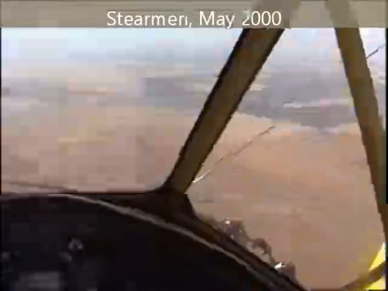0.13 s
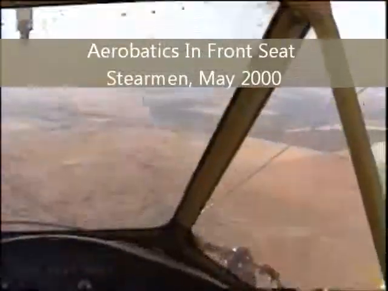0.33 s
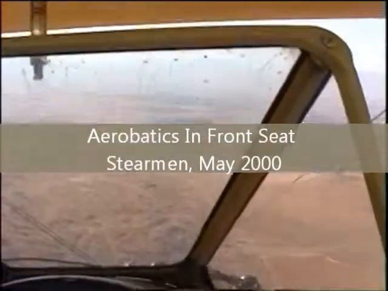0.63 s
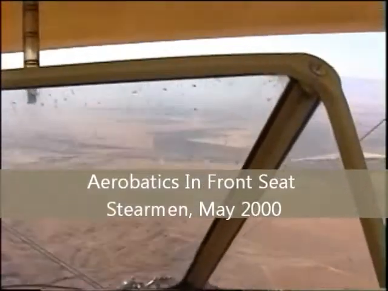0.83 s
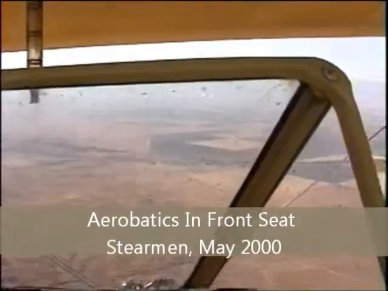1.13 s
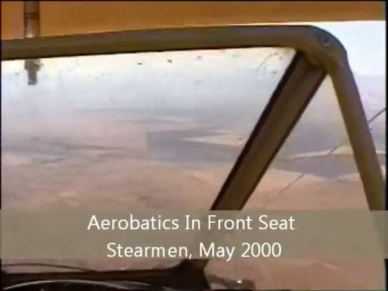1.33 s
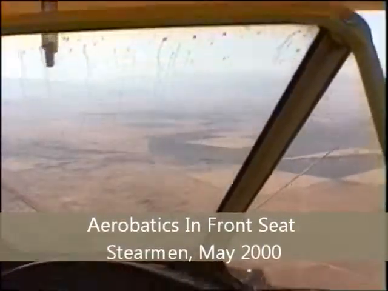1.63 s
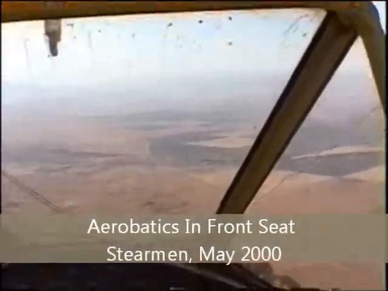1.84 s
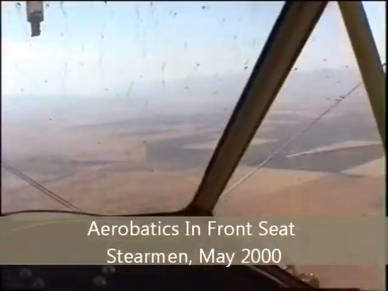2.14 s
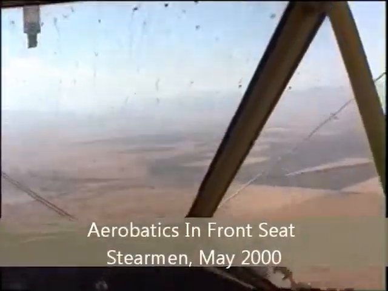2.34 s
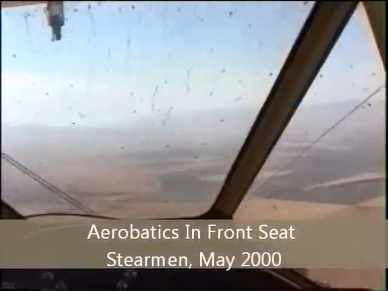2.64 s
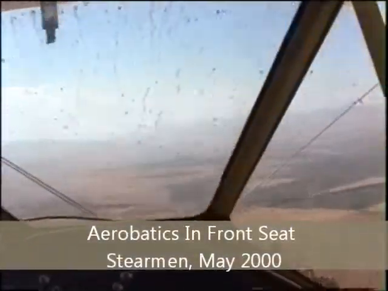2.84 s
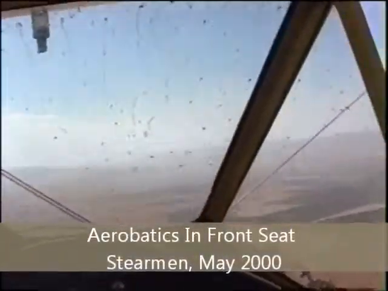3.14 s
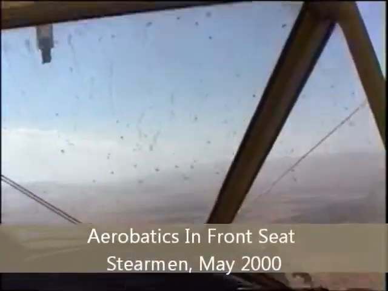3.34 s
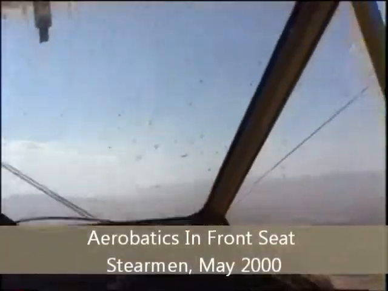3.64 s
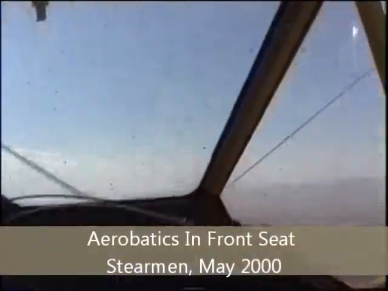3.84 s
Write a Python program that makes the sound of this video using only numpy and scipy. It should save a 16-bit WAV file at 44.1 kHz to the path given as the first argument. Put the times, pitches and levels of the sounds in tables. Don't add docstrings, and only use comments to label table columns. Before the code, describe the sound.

A radial piston aircraft engine drones in an open cockpit, fading in from silence. Wind buffets the overloaded onboard stereo microphone, roaring and hissing, while a high fluttering whistle enters midway and grows stronger.

```python
import sys
import numpy as np
from scipy import signal
from scipy.fft import rfft, irfft, next_fast_len
from scipy.io import wavfile
from scipy.ndimage import uniform_filter1d, map_coordinates

SR = 44100
rng = np.random.default_rng(int(sys.argv[2]) if len(sys.argv) > 2 else 0)


def makeup_ratio(level_db):
    decades = np.asarray(level_db, float) / 20
    return 10 ** decades


def to_wav(s):
    ch = np.atleast_2d(s).T
    pcm = np.round(np.clip(ch, -1, 1) * 32767)
    wavfile.write(sys.argv[1], SR, pcm.astype(np.int16))


N = 176400
CYCLE_HZ = 15.86


def unit(x):
    return x / np.sqrt(np.mean(x ** 2) + 1e-20)


def along(points, hz):
    point_hz, value = np.transpose(points)
    return np.interp(np.log(hz + 1), np.log(point_hz + 1), value)


def wobble(rate_hz):
    return map_coordinates(rng.standard_normal(400), [np.arange(N) * rate_hz / SR])


def filtered(x, response):
    m = next_fast_len(N + SR // 2)
    hz = np.fft.rfftfreq(m, 1 / SR)
    return irfft(rfft(x, m) * response(hz), m)[..., :N]


def split_db(left_over_right_db):
    return left_over_right_db * np.array([[.5], [-.5]])


def engine():
    # (multiple of the cycle [1], level [dB rms])
    orders = [(2, -51), (7, -38), (8, -38), (9, -36), (11, -41), (14, -41), (15, -42), (16, -37), (17, -43),
              (18, -41), (19, -38), (20, -38), (21, -39), (23, -33), (24, -42), (25, -38), (26, -41),
              (27, -39), (29, -45), (31, -47), (46, -50)]
    speed_wander, drone_db, sway_db = 0.001987, 0.5, 2
    cycles = np.cumsum(CYCLE_HZ * (1 + speed_wander * wobble(1.9923))) / SR
    drone = np.zeros((2, N))
    for order, level_db in orders:
        phase = 2 * np.pi * (order * cycles + rng.random()) + 0.29 * wobble(8)
        apart_rad = rng.normal(0, 6 / order) * np.array([[.5], [-.5]])
        gain = np.sqrt(2) * makeup_ratio(level_db + sway_db * wobble(5.948))
        drone += gain * np.sin(phase + apart_rad)
    return makeup_ratio(drone_db + split_db(1.2)) * drone


def whistle_breath():
    # (time [s], level [dB], pitch [Hz])
    breath_course = [
        (0, -48, 3052),
        (1.6, -45.5, 2998),
        (2.1, -33.5, 3067),
        (2.901, -31.5, 3218),
        (3.05, -36, 3082),
        (3.4, -31.5, 3186),
        (3.52, -34, 3033),
        (3.7, -31.5, 3157),
        (4, -28.5, 2993),
    ]
    flutter_hz, flutter_depth, width_hz, lowest_hz = 37.5, .6, 424, 2950
    time_s, level_db, pitch_hz = np.transpose(breath_course)
    now = np.arange(N) / SR
    air = filtered(rng.standard_normal((2, 2, N)), lambda f: 1 / (1 + (2 * f / width_hz) ** 2))
    air[1] = .6 * air[0] + .8 * air[1]
    phase = 2 * np.pi * np.cumsum(np.interp(now, time_s, pitch_hz) + 40 * wobble(15)) / SR
    flutter = np.sin(2 * np.pi * flutter_hz * now + .8 * wobble(6))
    opening = (1 + flutter_depth * flutter) * makeup_ratio(1.5 * wobble(30))
    band = air[:, 0] * np.cos(phase) + air[:, 1] * np.sin(phase)
    breath = makeup_ratio(np.interp(now, time_s, level_db)) * unit(opening * band)
    return filtered(breath, lambda f: 1 / (1 + (lowest_hz / (f + 1)) ** 40))


def whistle_chirps():
    # (time [s], level [dB rms], pitch [Hz], length [s])
    chirp_events = [(2.146, -28, 3050, 0.009), (2.397, -27, 3100, 0.005), (2.43, -28, 3180, 0.005),
                    (2.482, -27, 3110, 0.006), (2.527, -24, 3100, 0.004), (2.558, -27, 3100, 0.005),
                    (2.665, -23, 3160, 0.005), (2.745, -27, 3110, 0.009), (2.853, -28, 3160, 0.005),
                    (2.932, -27, 3270, 0.004), (2.994, -26, 3150, 0.008), (3.155, -26, 3100, 0.005),
                    (3.185, -26, 3060, 0.005), (3.263, -27, 3160, 0.007), (3.285, -26, 3070, 0.006),
                    (3.366, -27, 3180, 0.004), (3.391, -24, 3140, 0.004), (3.581, -25, 3020, 0.005),
                    (3.632, -27, 3120, 0.004), (3.656, -25, 3120, 0.004), (3.67, -26, 3190, 0.002),
                    (3.694, -26, 3090, 0.005), (3.713, -23, 3150, 0.005), (3.764, -26, 3090, 0.011),
                    (3.801, -27, 3160, 0.004), (3.845, -21, 3040, 0.006), (3.879, -19, 3050, 0.005),
                    (3.921, -26, 3080, 0.004), (3.933, -22, 3040, 0.007), (3.949, -24, 3060, 0.005)]
    chirp_db, half = .5, 900
    out = np.zeros(N + SR)
    t = np.arange(-half, half) / SR
    for time_s, level_db, pitch_hz, length_s in chirp_events:
        envelope = np.exp(-np.log(4) * (t / length_s) ** 2)
        jitter_rad = np.cumsum(rng.normal(0, .04, len(t)))
        tone = np.sin(2 * np.pi * (.995 * pitch_hz * t + rng.random()) + jitter_rad)
        out[round(time_s * SR):][:len(t)] += np.sqrt(2) * makeup_ratio(level_db + chirp_db) * envelope * tone
    return out[half:N + half]


def whistle():
    right_db, lag_s = -7.5, .00003
    left, right = whistle_breath() + whistle_chirps()
    right = filtered(right, lambda f: np.exp(-2j * np.pi * f * lag_s))
    return np.array([left, makeup_ratio(right_db) * right])


def rush(spectrum, alike, patchy_db, pan_db):
    z = signal.stft(rng.standard_normal((2, N)), nperseg=512)[2]
    field = uniform_filter1d(rng.standard_normal(z.shape[1:]), size=6, axis=0)
    field = uniform_filter1d(field, size=8, axis=1)
    pair = signal.istft(z * makeup_ratio(patchy_db * unit(field)), nperseg=512)[1][:, :N]

    def mid_side(hz):
        turn = np.arccos(along(alike, hz)) / 2
        return makeup_ratio(along(spectrum, hz)) * [np.cos(turn), np.sin(turn)]

    mid, side = filtered(pair, mid_side)
    return unit(np.array([mid + side, mid - side]) * makeup_ratio(split_db(pan_db)))


def buffeting():
    # (frequency [Hz], density [dB per Hz])
    buffet_spectrum = [(8, -24), (30, -11.5), (60, -2.5), (110, -0.5), (200, -3.5), (400, -16.5),
                       (800, -21.5), (1600, -32)]
    # (frequency [Hz], left-right likeness [-1..1])
    buffet_alike = [(60, -0.265), (160, -0.128), (400, 0.11)]
    level_db = -22 + 1.25 * np.array([wobble(11), wobble(12)])
    return makeup_ratio(level_db) * rush(buffet_spectrum, buffet_alike, patchy_db=0.76, pan_db=-1.5)


def screen_roar(speed_db, gust_db):
    # (frequency [Hz], density [dB per Hz])
    roar_spectrum = [(80, -48), (200, -5), (420, -0.5), (560, -7), (950, -6.5), (2000, -14), (4500, -17),
                     (16000, -30.5)]
    # (frequency [Hz], left-right likeness [-1..1])
    roar_alike = [(400, 0.636), (900, 0.805), (2000, 0.343), (3000, 0.515), (4500, 0.03)]
    level_db = -24 + 0.915 * speed_db + gust_db + 0.813 * wobble(40)
    return makeup_ratio(level_db) * rush(roar_spectrum, roar_alike, patchy_db=0.9335, pan_db=1)


def wire_hiss(speed_db, gust_db):
    # (frequency [Hz], density [dB per Hz])
    hiss_spectrum = [(2000, -6.5), (4500, -14), (5300, -4.5), (6400, 2.5), (8400, 1), (9500, -5),
                     (12500, -16), (16000, -31)]
    # (frequency [Hz], left-right likeness [-1..1])
    hiss_alike = [(4500, -0.11), (6000, -.25), (7500, -0.0048), (10000, 0.104)]
    edge_hz, edge_db_per_db = 8100, 2.88
    level_db = -27 + 0.76 * gust_db + 0.96 * wobble(60)
    hiss = rush(hiss_spectrum, hiss_alike, patchy_db=0.22, pan_db=-4.5)
    edge = filtered(hiss, lambda f: 1 / (1 + (edge_hz / (f + 1)) ** 12))
    return makeup_ratio(level_db) * (makeup_ratio(speed_db) * (hiss - edge) + makeup_ratio(edge_db_per_db * speed_db) * edge)


def slipstream():
    # (time [s], level [dB])
    airspeed = [
        (0, -3),
        (.8, -1.8),
        (1.6, -0.89),
        (2.2, -0.66),
        (2.5, 0.61),
        (3.2, 0.08),
        (4, 0.5),
    ]
    now = np.arange(N) / SR
    speed_db = np.interp(now, *np.transpose(airspeed))
    blades_db = .45 * np.sin(2 * np.pi * 4 * CYCLE_HZ * now)
    gust_db = .5 * wobble(2.856) + 0.573 * wobble(23.933) + blades_db
    return buffeting() + screen_roar(speed_db, gust_db) + wire_hiss(speed_db, gust_db)


def scene():
    return engine() + whistle() + slipstream()


def top_cut(x):
    return signal.sosfilt(signal.butter(12, 16420, fs=SR, output="sos"), x)


def record(dry):
    drive, ceiling_db, top_hz = .66, -12, 15760
    fade_start_s, opens_s, open_ramp_s = 0.166, .187, .012
    blip_s, blip_width_s, blip_db = .17, .007, -50
    now = np.arange(N) / SR
    overloaded = makeup_ratio(ceiling_db) * np.tanh(drive * unit(dry))
    x = filtered(overloaded, lambda f: f < top_hz)
    fade = (now - fade_start_s) * np.clip((now - opens_s) / open_ramp_s, 0, 1)
    fade += makeup_ratio(blip_db) * np.exp(-((now - blip_s) / blip_width_s) ** 2)
    return top_cut(x * fade)


dry = scene()
out = record(dry)
to_wav(out)
```